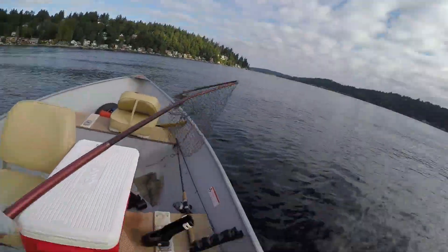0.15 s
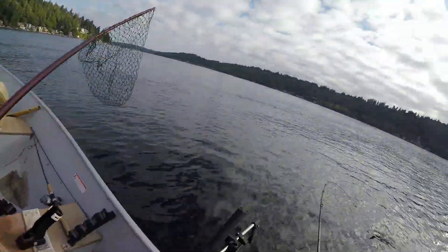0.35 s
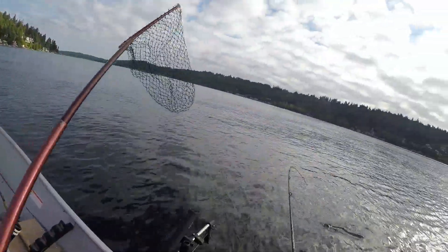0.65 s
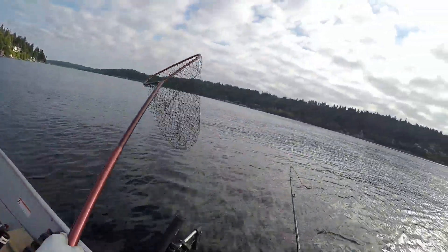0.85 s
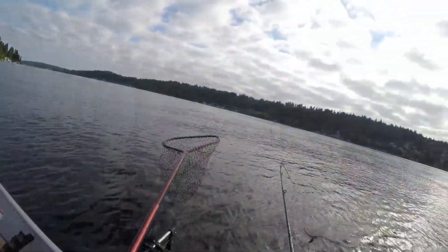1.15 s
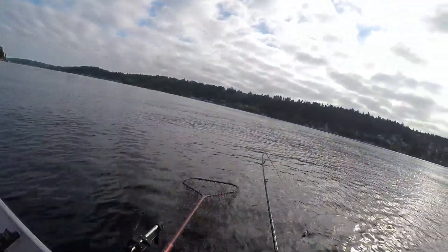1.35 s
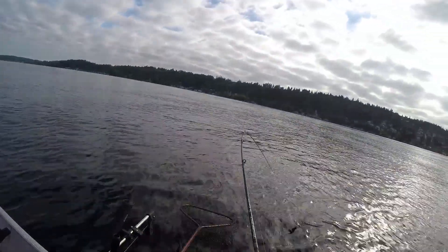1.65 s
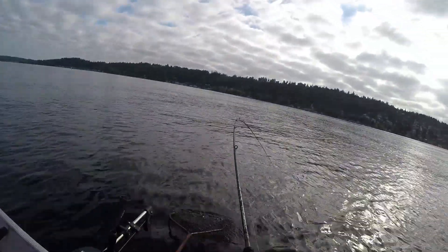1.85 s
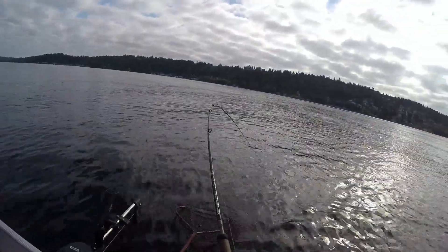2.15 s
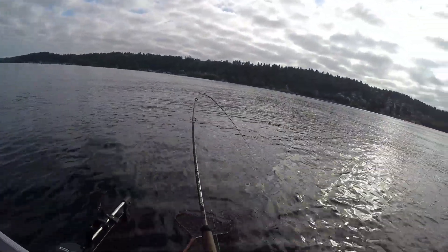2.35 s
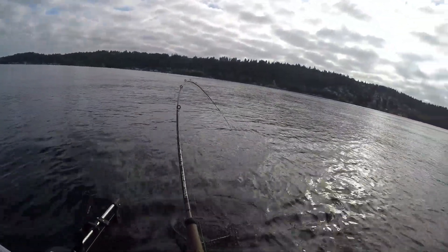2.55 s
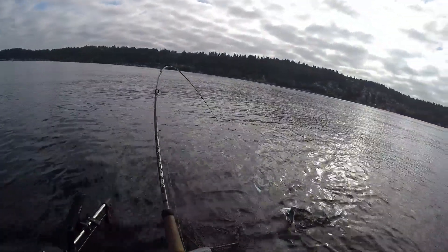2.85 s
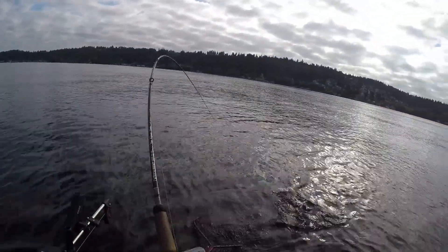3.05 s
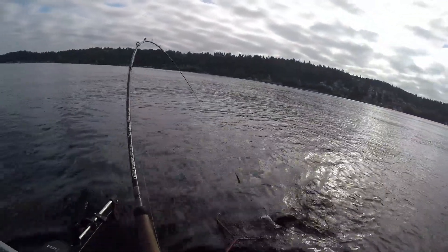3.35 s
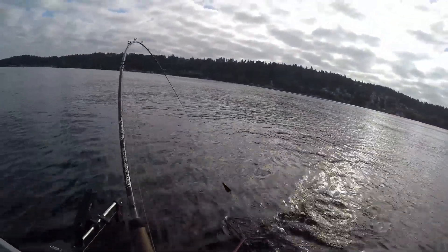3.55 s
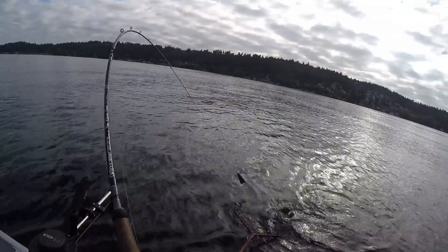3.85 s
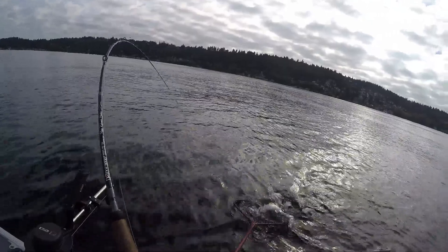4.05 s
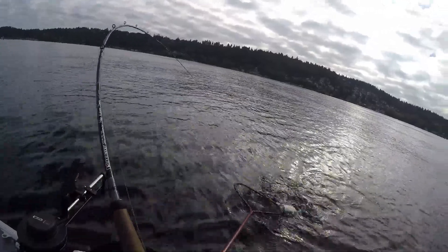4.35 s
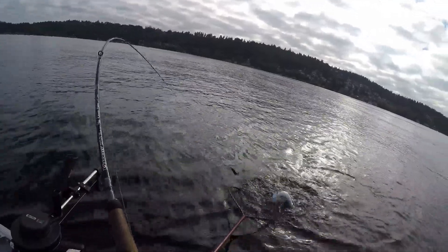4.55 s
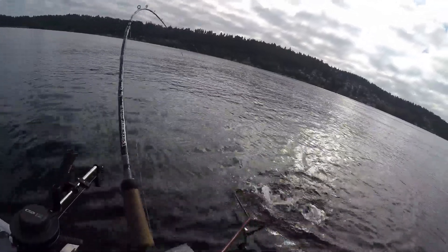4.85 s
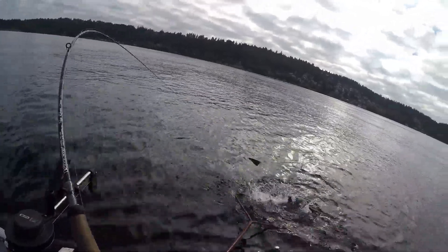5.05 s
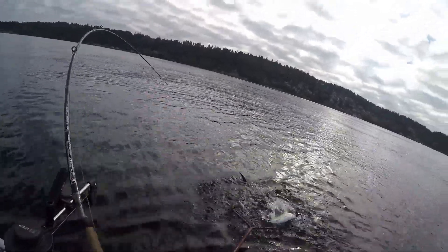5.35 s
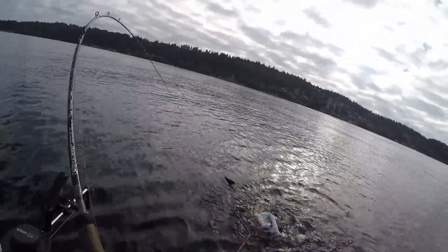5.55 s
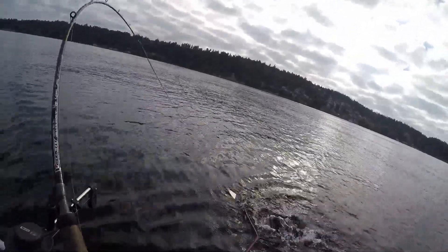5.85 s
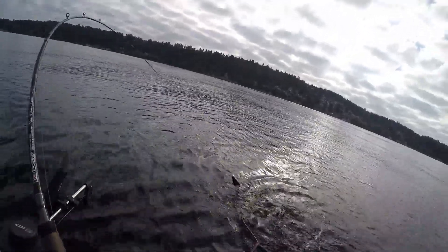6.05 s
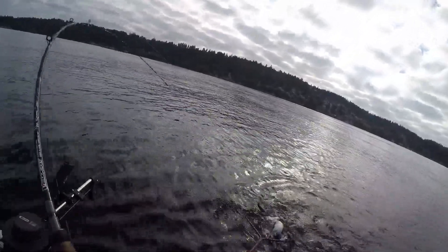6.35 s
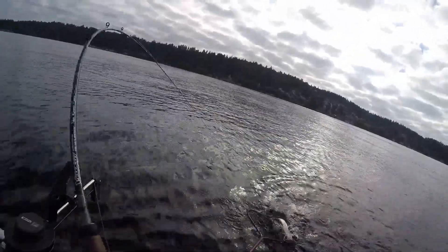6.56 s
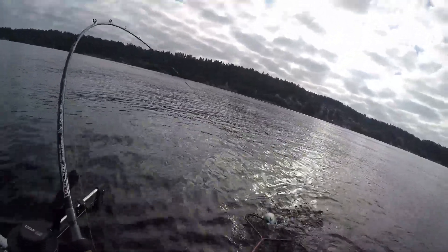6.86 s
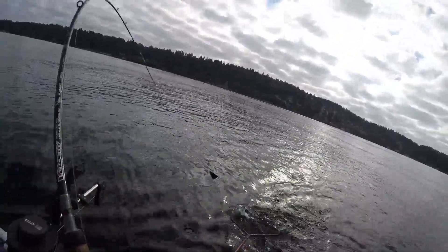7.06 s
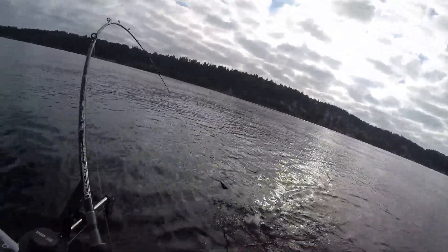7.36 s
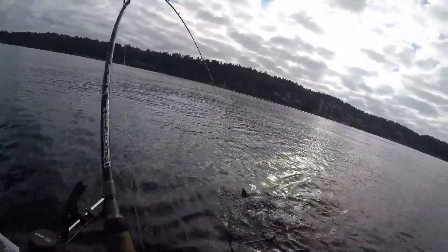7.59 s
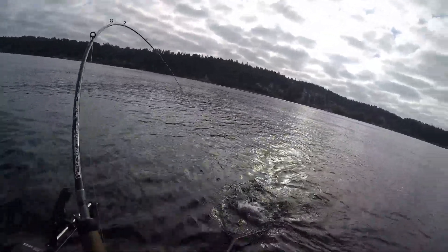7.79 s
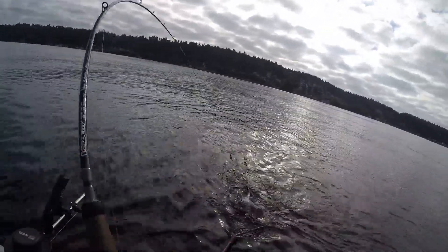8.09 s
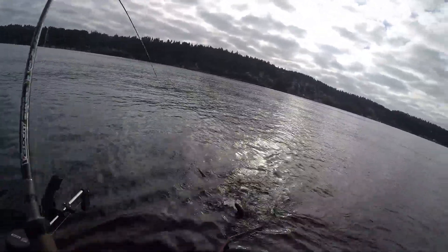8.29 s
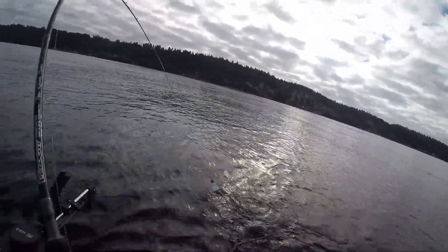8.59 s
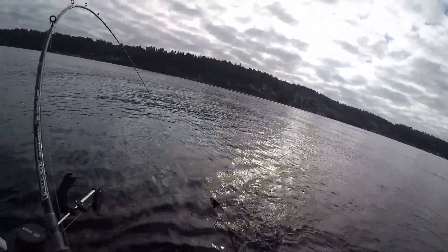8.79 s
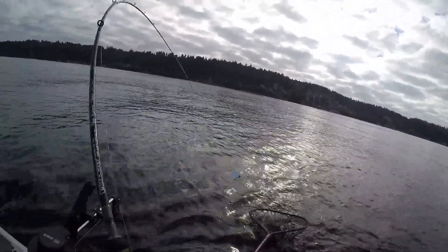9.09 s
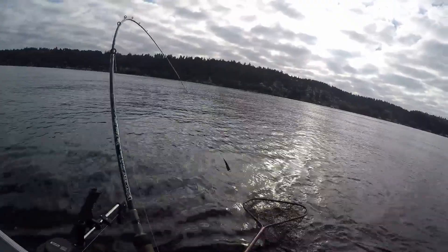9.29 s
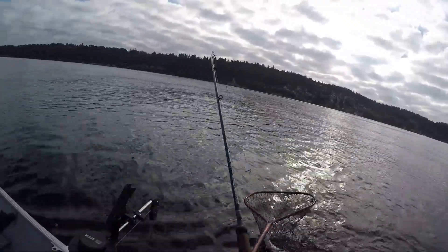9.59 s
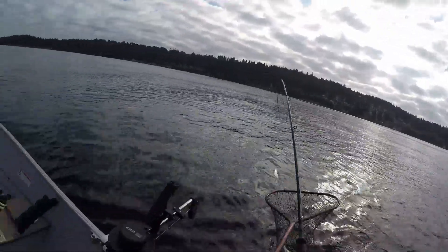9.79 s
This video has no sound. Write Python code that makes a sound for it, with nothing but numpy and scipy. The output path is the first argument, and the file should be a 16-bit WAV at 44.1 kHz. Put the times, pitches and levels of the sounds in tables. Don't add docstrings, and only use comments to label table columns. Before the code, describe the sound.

Low outboard putter on a calm lake, a brief net rattle and dripping, then bursts of splashing and bubbling from a struggling fish.

```python
import sys
import numpy as np
from scipy import signal
from scipy.io import wavfile

SR = 44100
rng = np.random.default_rng(int(sys.argv[2]) if len(sys.argv) > 2 else 0)


def dump(signal):
    limited = np.clip(np.atleast_2d(signal).T, -1, 1)
    pcm = np.round(limited * 32767).astype(np.int16)
    wavfile.write(sys.argv[1], SR, pcm)


def nominal_scale(level):
    x = np.asarray(level, float) / 20
    return 10 ** x


N = 437913
TIME = np.arange(N) / SR

# f/Hz, bandwidth/Hz, level/dB
CASE_MODES = [(427, 320, -17.5), (850, 310, -9), (1030, 158, -4), (1604, 72, -9), (2425, 140, -11),
              (2626, 81, -4), (3090, 189, 0), (3900, 208, 4.5), (4250, 430, 1.5), (4770, 140, -22),
              (5130, 240, -22), (6366, 353, -6.5), (6614, 255, -8), (7770, 490, -23), (7910, 330, -22),
              (10130, 830, -25), (11000, 440, -20), (13080, 510, -22), (13500, 400, -20), (15300, 860, -36)]
# t/s, peak level/dB, f/Hz
TEARS = [(0.1196, -53, 10700), (3.6461, -55, 13100), (3.7244, -58, 9780), (3.9584, -52, 8540),
         (4.1929, -51, 10900), (4.2188, -56, 9960), (4.5191, -51, 10400), (4.5506, -48, 11000),
         (4.7526, -51, 9800), (4.9661, -54, 9730), (5.1297, -47, 10300), (5.1492, -43, 9770),
         (5.2669, -46, 13500), (5.4066, -43.5, 13100), (5.4645, -47, 11000), (5.7324, -55, 12700),
         (5.7583, -48, 12800), (5.8247, -48, 9690), (5.9953, -48, 12100), (6.121, -50, 12700),
         (6.6174, -47, 9500), (7.2694, -50, 11100), (7.3118, -53, 10800), (7.3776, -52, 12600),
         (7.7902, -57, 11000), (7.9409, -48, 10700), (7.9857, -54, 9630), (8.081, -47.5, 10900),
         (8.1239, -52, 9490), (8.3699, -51, 9640)]


def rms_one(x):
    return x / np.sqrt(np.mean(x ** 2) + 1e-20)


def in_time(rows):
    s, *columns = np.transpose(rows)
    return [np.interp(TIME, s, c) for c in columns]


def band(x, low_hz, high_hz, order=2):
    sos = signal.butter(order, [low_hz, min(high_hz, .45 * SR)], "band", fs=SR, output="sos")
    return signal.sosfilt(sos, x)


def drift(rate):
    r = np.exp(-80 * np.pi * rate / SR)
    noise = rng.standard_normal(N // 40 + 2002)
    slow = signal.lfilter([1], [1, -2 * r, r * r], noise)[2000:]
    return np.interp(np.arange(N) / 40, np.arange(len(slow)), rms_one(slow))


def resonate(x, hz, width_hz):
    r = np.exp(-np.pi * width_hz / SR)
    feed = np.array([1, 0, -1]) * (1 - r * r) / 2
    return signal.lfilter(feed, [1, -2 * r * np.cos(2 * np.pi * hz / SR), r * r], x)


def body(x, modes):
    out = 0
    for k, (hz, width_hz, level_db) in enumerate(modes):
        out = out + (-1) ** k * nominal_scale(level_db) * resonate(x, hz, width_hz)
    return out


def ring(clicks, hz, t60):
    r, w = nominal_scale(-60 / (t60 * SR)), 2 * np.pi * hz / SR
    return signal.lfilter([0, np.sin(w)], [1, -2 * r * np.cos(w), r * r], clicks + 1e-18)


def add(out, s, piece):
    i = max(round(s * SR), 0)
    out[i:i + len(piece)] += piece[:N - i]


def chirp(hz, octaves, t60, attack_s):
    t = np.arange(round(t60 * SR)) / SR
    pitch = hz * 2 ** (octaves * np.minimum(2 * t / t60, 1))
    phase = 2 * np.pi * np.cumsum(pitch) / SR
    return np.sin(phase) * nominal_scale(-60 * t / t60) * np.minimum(t / attack_s, 1)


def grains(per_s, low_hz, high_hz, cycles, spread_db):
    sizes = nominal_scale(spread_db * np.minimum(rng.exponential(1, N), 5)) * rng.choice([-1, 1], N)
    born = rng.random(N) < per_s / SR
    pitches = np.geomspace(low_hz, high_hz, 14)
    dealt = rng.integers(0, 14, N)
    out = np.zeros(N)
    for k, hz in enumerate(pitches):
        out += ring(sizes * born * (dealt == k), hz, cycles / hz)
    return rms_one(out)


def bursts(events, t60, attack_s):
    out, t = np.zeros(N), np.arange(2000) / SR
    shape = nominal_scale(-60 * t / t60) * np.minimum(t / attack_s, 1)
    for (s, level_db, *_), noise in zip(events, rng.standard_normal((len(events), len(t)))):
        add(out, s, nominal_scale(level_db) * shape * noise)
    return out


def blips(events, cycles, gain_db):
    out = np.zeros(N)
    for s, level_db, hz in events:
        add(out, s, nominal_scale(level_db + gain_db) * chirp(hz, 0.03, cycles / hz, attack_s=0.00027))
    return out


def outboard():
    # t/s, firing number
    firings = [(.005, 0), (.321, 2), (1.270, 8), (2.379, 15), (4.600, 29), (5.064, 32), (5.383, 34),
               (6.341, 40), (6.976, 44), (7.931, 50), (9.058, 57), (9.855, 62)]
    # f/Hz, level/dB, t60/s
    hull = [(226, -45, .24), (268, -42.5, .17), (312, -45.5, .12), (195, -53, .1)]
    # f/Hz, bandwidth/Hz, level/dB
    panels = [(86, 56, -21), (153.3, 36, -2), (221, 33, -7.5), (261, 21, -5), (305, 36, 0), (350, 8.3, -13)]
    # t/s, drone level/dB, crank tone level/dB
    load = [(0.05, -51, -48), (0.21, -53, -55), (3.42, -50, -51.5), (4.85, -52.5, -60), (5.51, -50.5, -54),
            (6.06, -49, -64), (6.63, -50.5, -50.5), (7.02, -51, -65.5), (8.52, -49, -52), (9.1, -50, -57),
            (9.62, -53, -59), (9.9, -58, -56)]
    s, number = np.transpose(firings)
    cycle = np.interp(TIME, s, number)
    at = np.flatnonzero(np.diff(np.floor(cycle + .03)))
    thuds = np.zeros(N)
    for hz, level_db, t60 in hull:
        clicks = np.zeros(N)
        clicks[at] = nominal_scale(level_db + 1.5 * rng.standard_normal(len(at)))
        thuds += ring(clicks, hz, t60)
    thuds = signal.sosfilt(signal.butter(6, 350, fs=SR, output="sos"), thuds)

    drone = body(rng.standard_normal(N), panels)
    drone = rms_one(signal.sosfilt(signal.butter(8, 345, fs=SR, output="sos"), drone))
    drone_db, crank_db = in_time(load)
    drone_db = drone_db + 1.4 - 1.5 * np.cos(2 * np.pi * (cycle - .55))

    crank_hz = 129.8 + 1.43 * drift(2.77)
    crank = np.sin(2 * np.pi * np.cumsum(crank_hz) / SR)
    swell_db = 4.0 * np.cos(4 * np.pi * (cycle - .28))
    return thuds + nominal_scale(drone_db) * drone + nominal_scale(crank_db + 2.0 + swell_db) * crank


def rumble():
    # t/s, level of 9-28 Hz/dB, level of 38-82 Hz/dB
    motion = [(0.0, -26.5, -62), (0.08, -36.5, -41), (0.36, -24.5, -41.5), (0.47, -51, -45),
              (0.52, -32.5, -42), (0.94, -33, -43.5), (1.3, -35.5, -40.5), (3.48, -33.5, -47.5),
              (3.57, -28, -35), (3.71, -30.5, -59), (4.37, -32, -55), (4.48, -26, -29.5),
              (4.64, -30.5, -77), (5.31, -27, -35), (5.36, -50, -45), (5.42, -21, -35), (5.72, -31, -67),
              (5.78, -33.5, -40), (6.09, -26, -68), (6.16, -35, -42), (6.67, -33.5, -50), (6.88, -25, -51),
              (6.99, -37, -39.5), (7.33, -27, -38.5), (7.63, -34, -49), (7.88, -28.5, -57),
              (7.96, -29, -32), (8.08, -35, -38), (8.4, -34.5, -56), (8.46, -33, -33), (8.57, -32, -45),
              (8.99, -34, -36.5), (9.07, -34.5, -51), (9.13, -29, -41), (9.4, -29, -40), (9.82, -38, -39.5),
              (9.87, -22, -44), (9.93, -38, -38)]
    # t/s, peak level/dB, f/Hz, t60/s
    bumps = [
        (3.53, -21.5, 31, 0.26),
        (5.41, -20, 27, 0.12),
        (6.798, -14, 18, 0.72),
        (6.876, -16.5, 65, .06),
        (7.318, -21, 30, 0.091),
        (7.954, -10.5, 67, 0.083),
    ]
    deep_db, upper_db = in_time(motion)
    deep = rms_one(band(rng.standard_normal(N), 9, 28.4))
    upper = rms_one(band(rng.standard_normal(N), 38.3, 81.5) * nominal_scale(0.73 * drift(3.3)))
    out = nominal_scale(deep_db - 0.5) * deep + nominal_scale(upper_db - 3.5) * upper
    for s, level_db, hz, t60 in bumps:
        add(out, s, -nominal_scale(level_db) * chirp(hz, -0.14, t60, attack_s=0.00745))
    return out


def lake_floor():
    # f/Hz, level/dB per Hz
    spectrum = [(210, -31), (350, 1), (417, -11.5), (563, -18.5), (837, -12), (1010, -19), (1280, -20.5),
                (2420, -19.5), (5620, -26), (12600, -34), (14300, -40), (15500, -48)]
    out, white = 0, rng.standard_normal((2, N))
    edges = 330 * 2 ** np.arange(0, 6.1, .5)
    hz, db = np.transpose(spectrum)
    for k, (low, high) in enumerate(zip(edges, edges[1:])):
        centre = np.log(low * high) / 2
        gain_db = np.interp(centre, np.log(hz), db) + 1.5 * drift(8.5)
        out = out + nominal_scale(gain_db) * band(white[k % 2], low, high)
    return nominal_scale(-62) * rms_one(out)


def water():
    # t/s, spray level/dB, gurgle level/dB and mist level/dB relative to spray
    thrash = [(0.04, -66, 14.5, 0), (0.09, -62, -6, -12), (0.12, -56, -10, -10), (0.2, -48.5, -12, -19),
              (0.26, -75, 6, -4), (0.37, -69.5, -0.5, -2.5), (1.36, -82.5, 10, 6), (1.47, -65, -1, -7),
              (2.6, -76, 9.5, -11), (2.96, -63, -2, -8), (3.01, -53.5, 4, -17), (3.07, -62.5, -9, -11),
              (3.4, -65.5, 2, -5), (3.45, -61, -16, -14), (3.56, -68.5, -9, -1), (3.62, -57, -6, -13),
              (3.7, -64.5, -2, -6), (3.73, -56, -28, -14), (3.79, -64, -3, -6), (3.95, -50.5, -6, -21),
              (4.0, -61, 0, -3), (4.09, -45.5, -4, -20), (4.14, -47, -4, -13), (4.17, -55, -3, -14),
              (4.39, -57.5, -2, -9), (4.56, -54, -21, -10.5), (4.64, -57, 1, -17), (4.75, -48.5, -5.5, -12),
              (5.63, -49.5, -9, -10), (5.69, -57.5, -1, -6), (5.88, -50.5, -8, -11.5),
              (6.05, -55.5, -10, -8.5), (6.15, -48, -9, -11.5), (6.24, -56, -11, -12),
              (6.51, -55.5, -7, -6.5), (6.54, -42.5, -22, -16), (6.6, -60, -1, -8), (6.62, -52.5, -7, -11),
              (6.65, -52, -3, -11), (6.73, -55, -9, -8.5), (7.09, -58, 3.5, -10.5), (7.14, -49.5, -11, -12),
              (7.48, -52.5, 0, -12.5), (7.69, -53.5, -10, -13), (7.75, -52, -19, -13),
              (7.78, -55, -14, -5.5), (7.86, -57.5, 0, -17), (8.11, -56, -24, -8.5),
              (8.17, -45, -10.5, -21), (8.19, -55.5, 7.5, -8), (8.25, -61, -13, -7), (8.28, -62, 1, -16),
              (8.39, -55, -1, -10), (8.47, -67, -1.5, -4), (9.32, -64, -2.5, -10), (9.35, -72, 10, -5),
              (9.65, -64, -6.5, -9), (9.93, -64.5, 2, -9)]
    # t/s, peak level/dB, f/Hz
    impact_events = [(0.1196, -35.5, 4030), (0.1685, -37, 4170), (0.196, -41, 3920), (2.7596, -49, 3960),
                     (3.1592, -47, 4200), (3.3323, -47, 3750), (3.4276, -41, 3700), (3.4506, -41.5, 4130),
                     (3.5334, -42.5, 3340), (3.6077, -39, 3170), (3.6406, -39.5, 3850), (3.7244, -39, 3020),
                     (3.8467, -41, 4120), (3.921, -38, 3850), (3.9404, -49, 3150), (3.9567, -34, 4120),
                     (4.0637, -39, 3960), (4.1011, -32, 3120), (4.1435, -38, 4150), (4.2318, -41.5, 3000),
                     (4.4393, -38.5, 2720), (4.4692, -40, 3100), (4.4882, -38.5, 4430), (4.5176, -36, 3020),
                     (4.5496, -34.5, 3030), (4.7431, -46, 3000), (4.7581, -34, 4030), (4.9072, -38, 3030),
                     (5.0, -34.5, 4130), (5.0464, -36, 3840), (5.3587, -54, 3600), (5.3812, -53, 3900),
                     (5.4066, -31.5, 3900), (5.465, -41, 3090), (5.4864, -36.5, 2800), (5.5588, -44, 4200),
                     (5.6396, -36.5, 3030), (5.7598, -33.5, 4020), (5.8152, -50, 3920), (5.8311, -34, 4230),
                     (5.876, -36, 3740), (5.893, -31.5, 3960), (6.0861, -44, 4060), (6.132, -33.5, 4150),
                     (6.328, -44, 4250), (6.3704, -38, 3230), (6.4093, -42, 4310), (6.539, -31, 4260),
                     (6.6533, -34, 4160), (6.981, -44, 3020), (7.2694, -32, 4120), (7.3672, -46, 3240),
                     (7.4106, -49, 4050), (7.6355, -47, 3600), (7.7438, -34.5, 4150), (8.0925, -37.5, 3880),
                     (8.1219, -36, 3840), (8.1524, -31, 2900), (9.0224, -39.5, 3800), (9.0927, -49.5, 4270),
                     (9.1426, -50, 3720), (9.617, -41, 4400),
                     (0.2094, -35, 3830), (0.3471, -51, 3960), (0.5307, -50, 3870), (0.5587, -52, 3800),
                   (0.7547, -52, 4070), (1.4266, -49, 3250), (1.452, -47, 3820), (1.5219, -61, 3960),
                   (1.8398, -47.5, 2450), (1.8844, -48, 3850), (1.905, -48, 4210), (2.1755, -50, 3920),
                   (2.3261, -54, 3900), (2.9885, -44, 3760), (8.225, -48, 3150), (8.374, -43, 3060),
                   (8.394, -48.5, 3730), (8.4863, -47, 3080), (8.7784, -48, 3160), (9.269, -48, 4090),
                   (9.298, -44, 4070), (9.7394, -55, 3340), (9.7596, -46.5, 6040)]
    spray_db, gurgle_db, mist_db = in_time(thrash)
    spray = grains(1900 * nominal_scale(2.5 * drift(25)), 1500, 7200, cycles=14.0, spread_db=4.0)
    mist = grains(3500 * nominal_scale(2.0 * drift(30)), 7500, 15000, cycles=22.0, spread_db=3.6)
    gurgle = grains(300 * (TIME > .03), 340, 1230, cycles=12.3, spread_db=3.0)
    out = nominal_scale(spray_db - 1.0) * rms_one(body(spray, CASE_MODES))
    out += nominal_scale(spray_db + mist_db + 1.0) * rms_one(body(band(mist, 4600, 24000), CASE_MODES))
    out += nominal_scale(spray_db + gurgle_db - 1.5) * rms_one(body(gurgle, CASE_MODES))
    hits = impact_events
    slaps = bursts(hits, .024, attack_s=.0015)
    return out + nominal_scale(7.5) * body(slaps, CASE_MODES) + blips(hits, 53, -2.1)


def flicks():
    tear = band(bursts(TEARS, .03, attack_s=.009), 8500, 15500)
    return nominal_scale(37) * body(tear, CASE_MODES) + blips(TEARS, 105, 1.5)


def bubbles():
    # t/s, peak level/dB, f/Hz, pitch rise/octaves
    plops = [(0.856, -47, 1030, 0.22), (1.003, -43.5, 510, 0.37), (1.55, -43, 1030, 0.1),
             (2.979, -46, 420, 0.26), (3.011, -42, 905, 0.27), (3.468, -50, 1560, 0.24),
             (3.592, -36.5, 1030, 0.21), (3.948, -41, 740, 0.25), (4.079, -40, 1060, 0.59),
             (4.233, -60, 426, 0.3), (4.414, -41.5, 525, 0.4), (4.524, -43, 1030, 0.3),
             (4.62, -44, 900, 0.33), (4.653, -45, 1030, 0.39), (4.696, -43, 874, 0.2),
             (4.863, -44, 1040, 0.3), (4.987, -39, 807, 0.27), (5.114, -41, 527, 0.42),
             (5.233, -35, 450, 0.28), (5.337, -47, 1020, 0.3), (5.418, -44, 423, 0.3),
             (5.475, -37.5, 666, 0.12), (5.838, -32.5, 464, 0.56), (6.074, -44, 506, 0.32),
             (6.209, -44, 825, 0.21), (6.28, -42.5, 1040, 0.3), (6.601, -40, 505, 0.35),
             (7.206, -39, 427, 0.27), (7.261, -43, 420, 0.25), (7.312, -41, 930, 0.24),
             (7.801, -42.5, 1040, 0.26), (8.149, -44, 930, 0.23)]
    # t/s, level/dB, start f/Hz, glide/octaves, length/s
    gulps = [(0.552, -39.5, 341, 0.061, 0.062), (1.291, -46, 343, 0.055, 0.052),
             (1.863, -60.5, 2270, -.3, .03), (4.56, -58, 7130, -0.1, 0.039), (2.11, -59, 1610, 0.18, 0.021),
             (2.237, -52, 530, 0.33, 0.026), (2.292, -53.5, 510, 1.4, 0.039), (2.321, -50, 350, 0.59, .03),
             (2.376, -59.5, 1950, 0.17, 0.028), (2.25, -49, 370, 0.32, 0.049),
             (2.977, -52.5, 380, 0.45, 0.031), (2.86, -45, 350, 0.32, 0.041), (4.073, -55, 417, 0.4, 0.034),
             (4.42, -43.5, 316, 0.23, 0.088), (5.281, -39, 328, 0.42, 0.026),
             (5.333, -39, 385, -0.52, 0.022), (6.612, -46.5, 444, 0.58, 0.028),
             (6.973, -55.5, 407, 0.68, .04)]
    out = nominal_scale(10.0) * band(bursts(plops, 0.05, attack_s=0.0041), 250, 860)
    for s, level_db, hz, octaves in plops:
        add(out, s, nominal_scale(level_db - 5.5) * chirp(hz, octaves, 0.057, attack_s=0.00067))
    churn = drift(90)
    for s, level_db, hz, octaves, length_s in gulps:
        t = np.arange(round(length_s * SR)) / (length_s * SR)
        phase = 2 * np.pi * np.cumsum(hz * 2 ** (octaves * t)) / SR
        wobble = 1 + 0.46 * churn[round(s * SR):][:len(t)]
        add(out, s, nominal_scale(level_db) * np.sin(np.pi * t) * wobble * np.sin(phase))
    return out


def net_drain():
    # t/s, level/dB
    foam = [
        (1.48, -78),
        (1.546, -70),
        (1.576, -59.5),
        (1.798, -79),
        (1.832, -61),
        (2.12, -86),
    ]
    gate = (TIME > foam[0][0]) & (TIME < foam[-1][0])
    hiss = resonate(resonate(rng.standard_normal(N), 3930, 260), 3930, 260)
    hiss = hiss * nominal_scale(1.9 * drift(25))
    return gate * nominal_scale(in_time(foam)[0] - 2.5) * rms_one(hiss)


def fishing_line():
    # t/s, f/Hz, rms level/dB
    hum = [
        (8.9, 280, -52),
        (8.99, 273.2, -62),
        (9.708, 269, -54),
        (9.884, 271, -61.5),
        (9.93, 254, -67),
    ]
    hz, level_db = in_time(hum)
    fade = np.clip((TIME - hum[0][0]) / 0.11, 0, 1)
    level = nominal_scale(level_db + 8.0 + 2.5 * drift(18))
    phase = 2 * np.pi * np.cumsum(hz + 1.55 * drift(6.6)) / SR
    return fade * level * np.sin(phase)


def scene():
    lake = water() + flicks() + bubbles() + net_drain() + lake_floor()
    return (outboard() + fishing_line() + rumble() + lake)[None]


def band_limit(x):
    return signal.sosfilt(signal.butter(12, 15680, fs=SR, output="sos"), x)


def record(dry):
    x = signal.sosfilt(signal.butter(2, 8, "high", fs=SR, output="sos"), dry)
    x = signal.sosfilt(signal.ellip(5, .5, 14, 15290, fs=SR, output="sos"), x)
    return band_limit(x)


dry = scene()
out = record(dry)
dump(out)
```